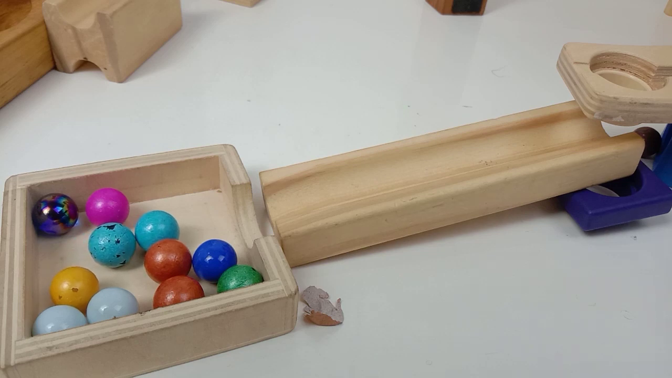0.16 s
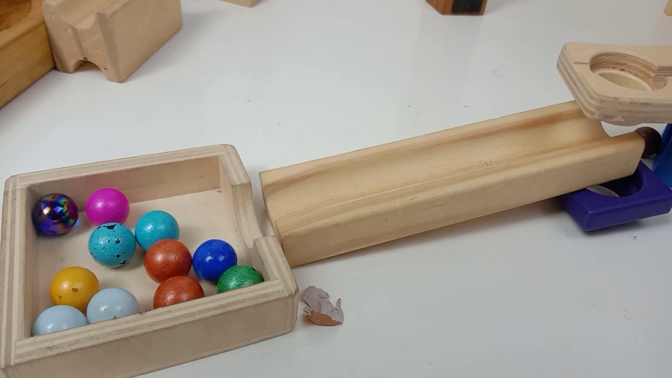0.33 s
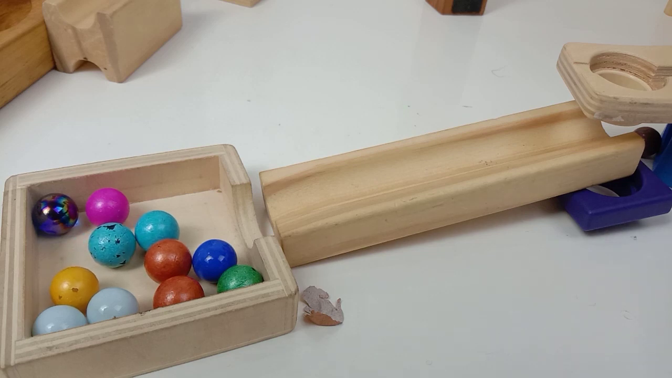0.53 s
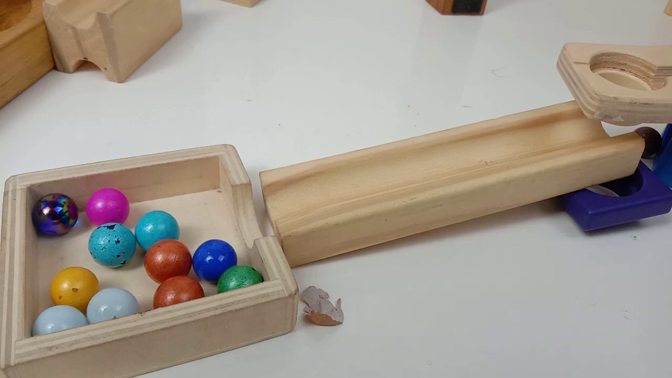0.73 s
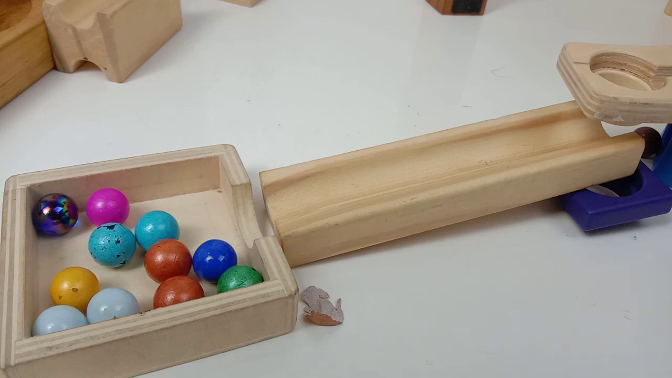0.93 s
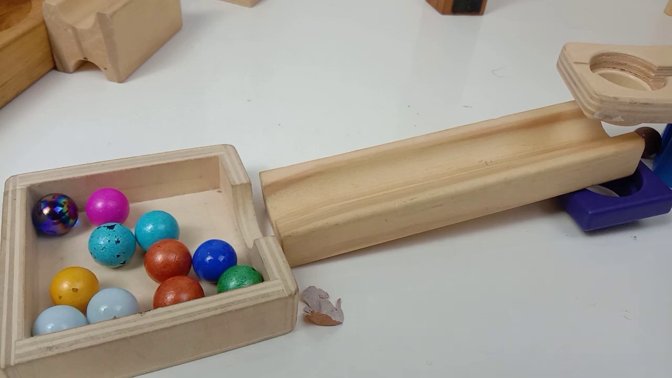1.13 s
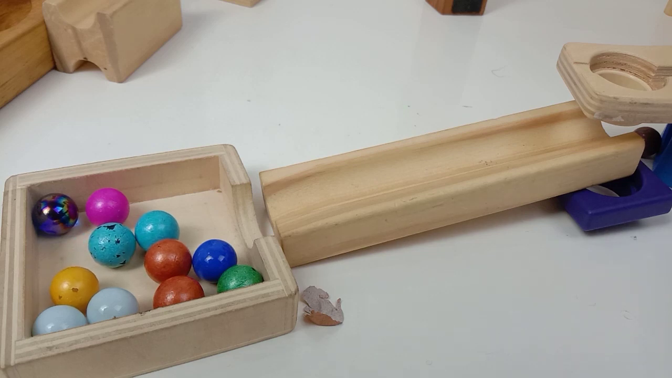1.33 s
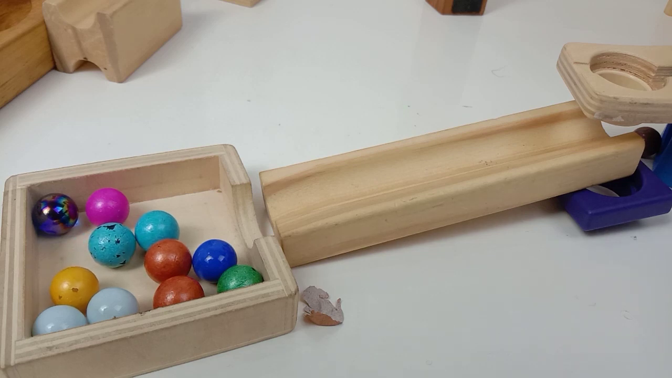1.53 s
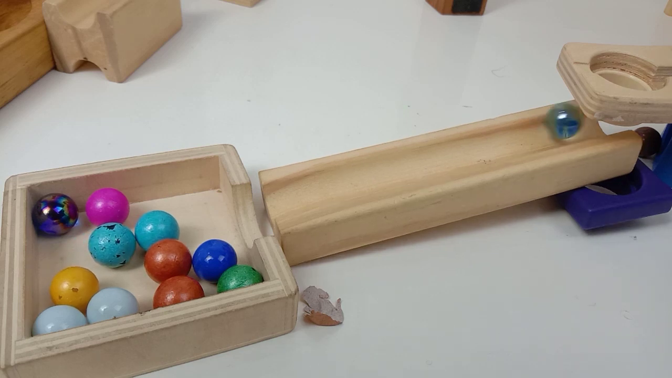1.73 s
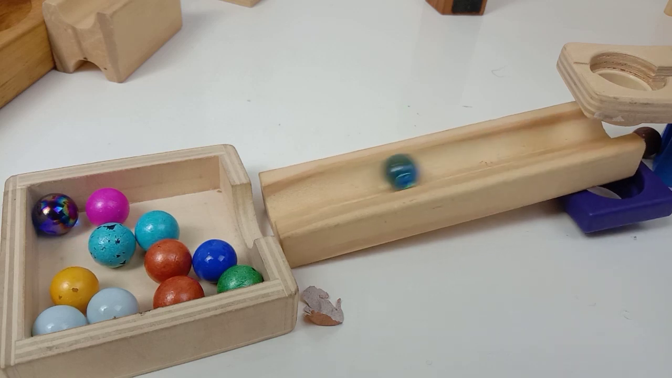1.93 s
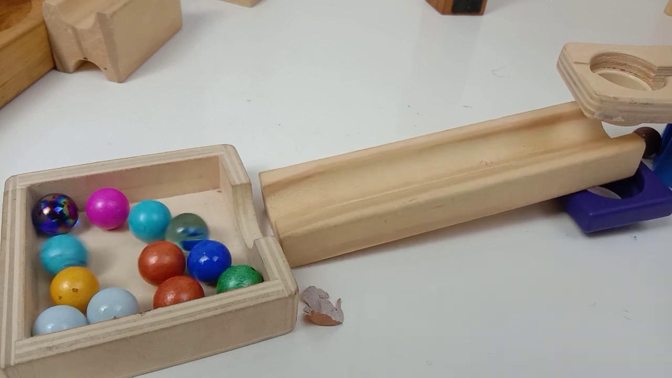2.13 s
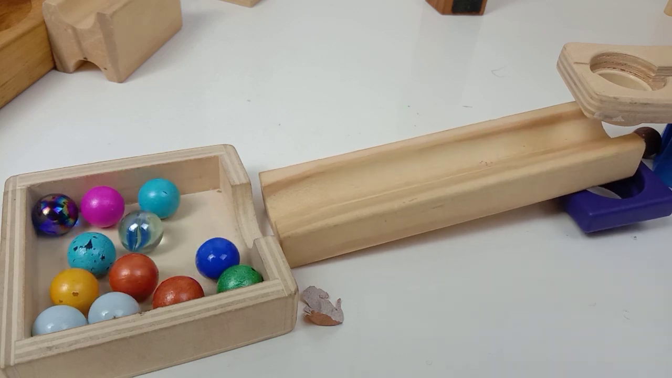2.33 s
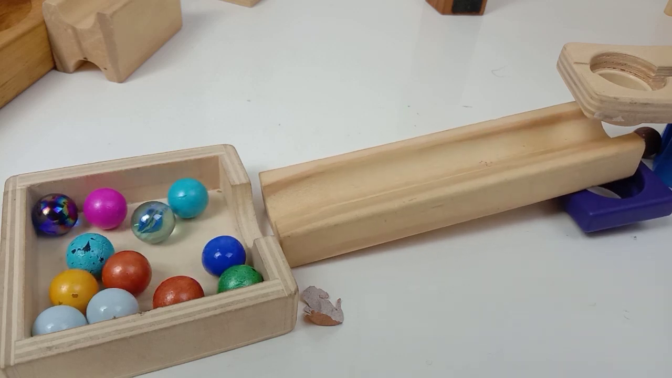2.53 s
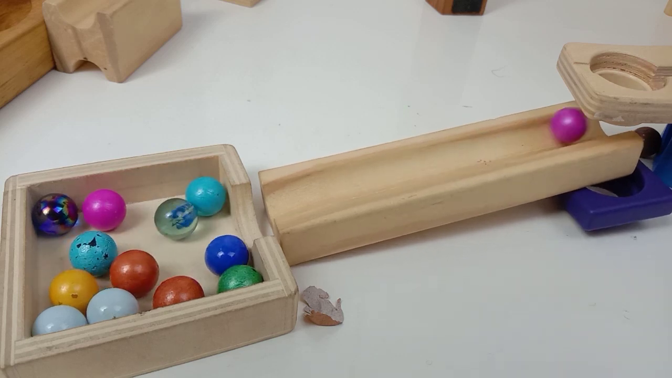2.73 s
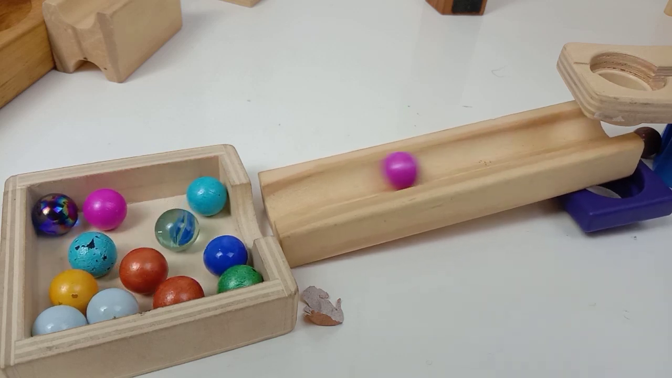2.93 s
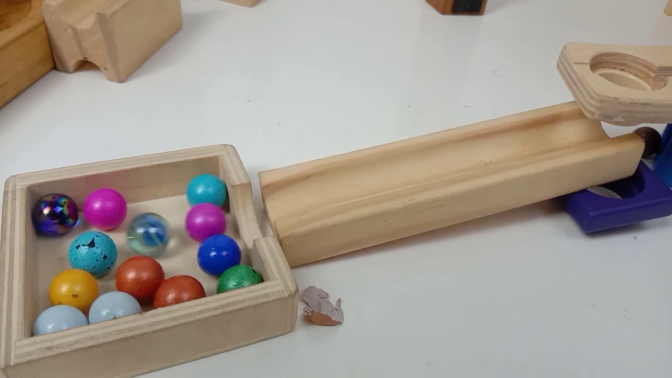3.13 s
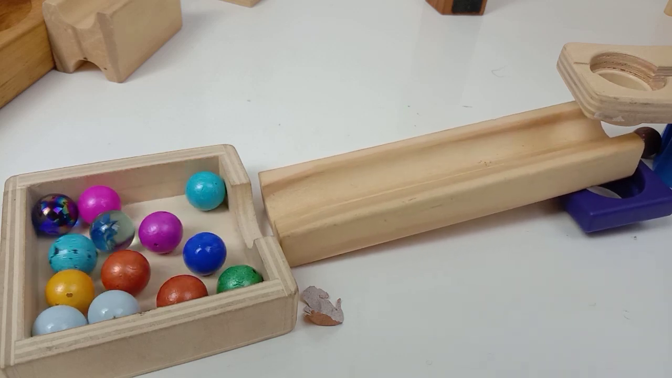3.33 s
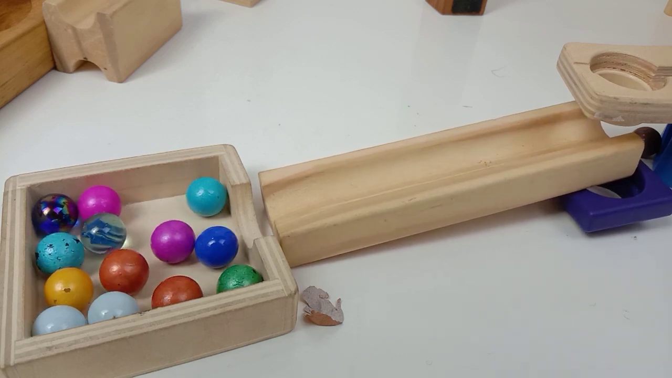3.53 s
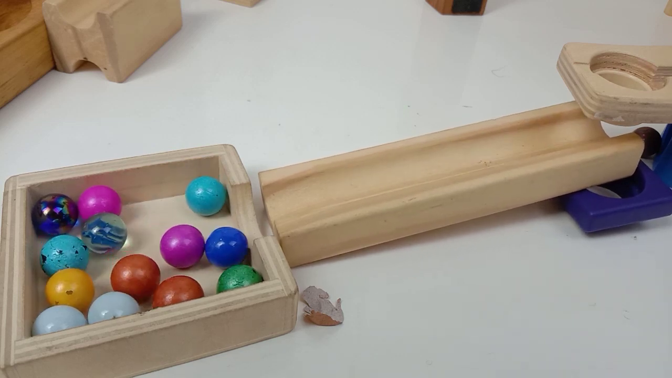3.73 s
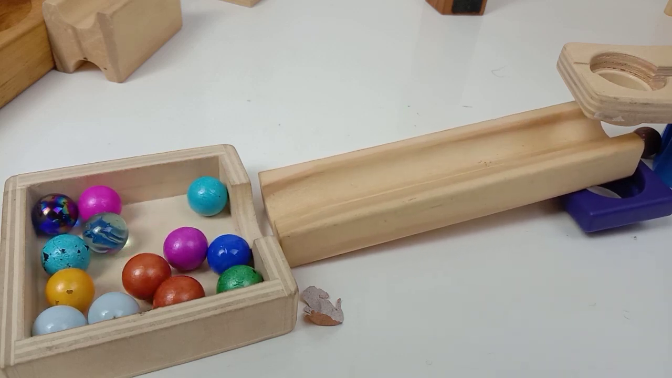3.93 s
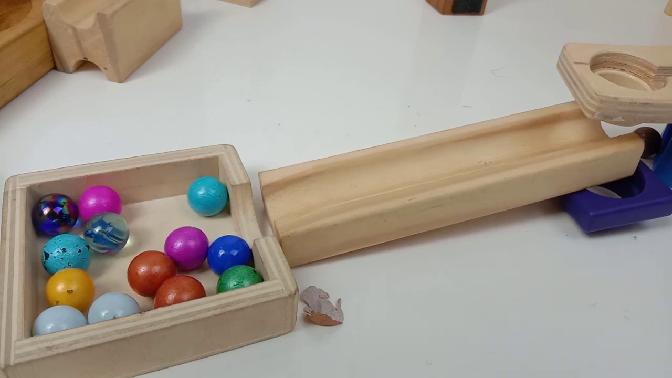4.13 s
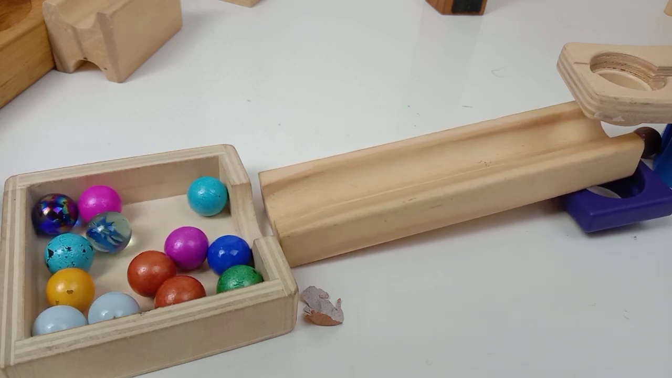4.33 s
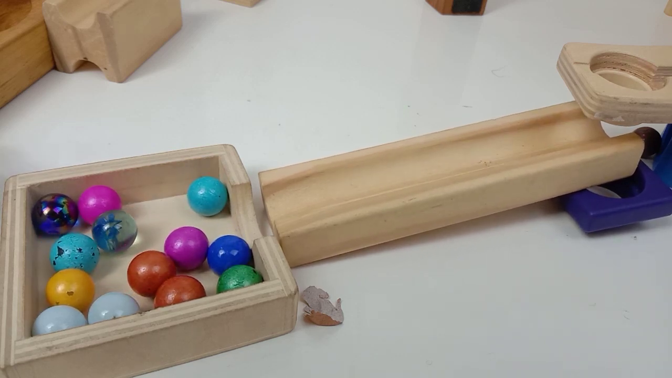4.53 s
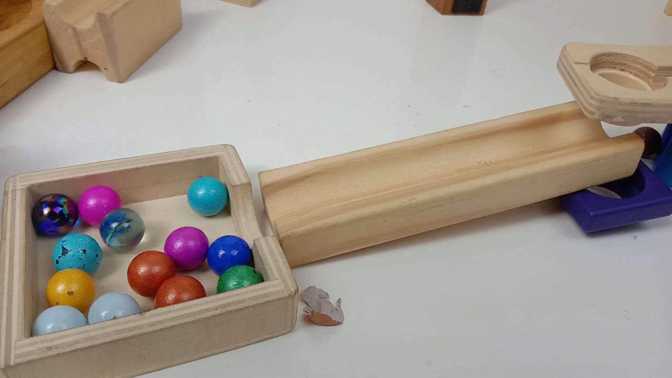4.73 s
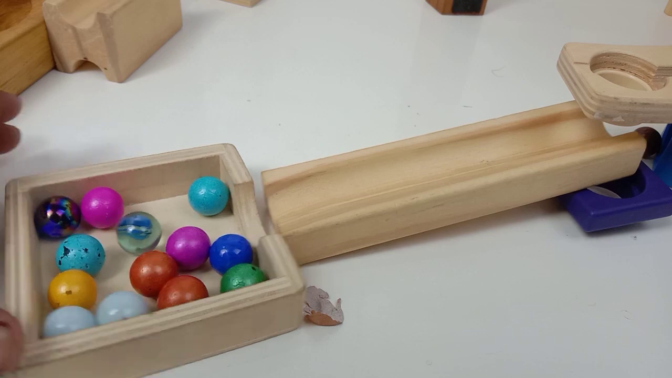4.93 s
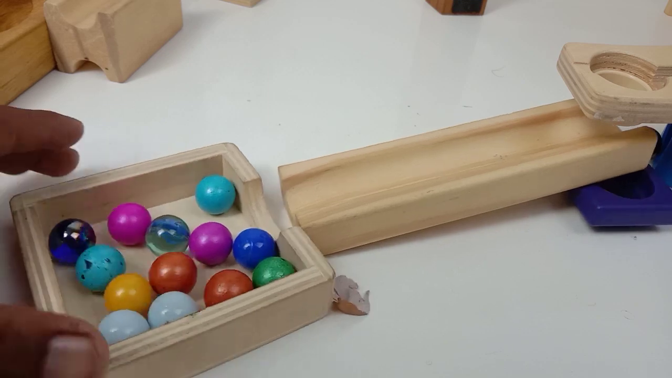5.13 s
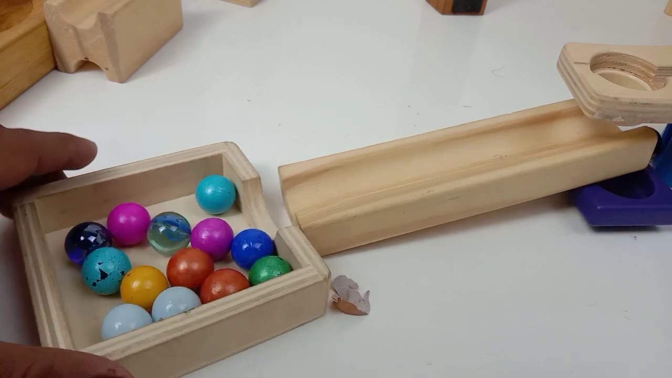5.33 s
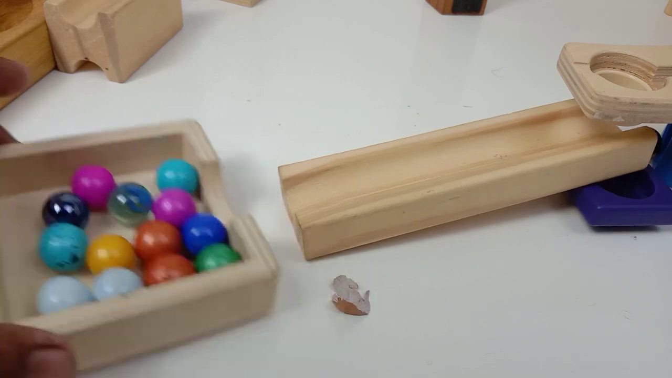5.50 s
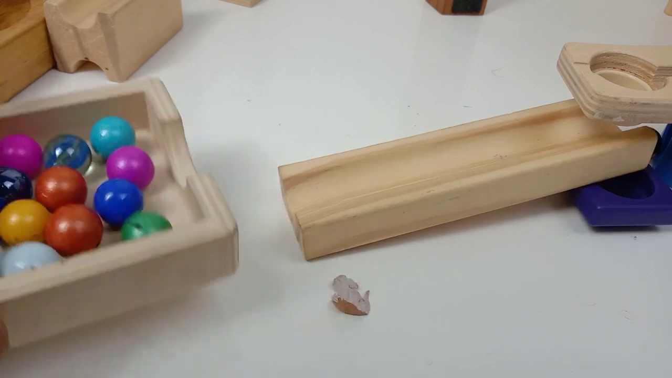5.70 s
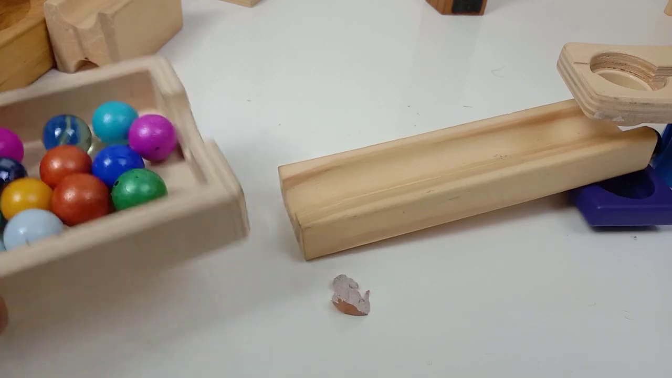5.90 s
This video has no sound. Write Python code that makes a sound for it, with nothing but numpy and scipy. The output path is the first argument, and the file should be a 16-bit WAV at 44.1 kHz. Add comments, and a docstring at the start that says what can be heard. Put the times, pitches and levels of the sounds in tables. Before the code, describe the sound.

Two marbles roll down a wooden ramp and chute into a tray of marbles, which rattle as it is dragged and lifted.

```python
"""A small live room, heard through a close microphone with a limiter. Two marbles in turn drop onto a
wooden ramp, roll along it, fall into a chute and run into a tray full of marbles, which clack and settle.
A hand then drags the tray over the table and lifts it, and the marbles rattle against its walls.
Each impact excites the resonant modes of the body struck; rolling drives the same modes with a stream
of tiny bumps. Diffuse reverberation and a faint hush surround them."""
import sys
import numpy as np
from scipy import signal
from scipy.fft import rfft, irfft
from scipy.io import wavfile
from scipy.ndimage import uniform_filter1d, minimum_filter1d

SR = 44100
rng = np.random.default_rng(int(sys.argv[2]) if len(sys.argv) > 2 else 0)


def transcribe(u):
    """Save the signal u as a 16-bit wav file named by the first command-line argument.

    u: samples, shape (n,) or (channels, n), limited to [-1, 1]; the rate is SR.
    q: integer samples, one column per channel.
    """
    v = np.clip(np.atleast_2d(u).T, -1, 1)
    q = np.round(v * 32767).astype(np.int16)
    wavfile.write(sys.argv[1], SR, q)


N = 267246
SIZE = 16384  # samples in an impulse response
HZ = np.maximum(np.arange(SIZE // 2 + 1) * SR / SIZE, 1)
TIME = np.arange(N) / SR

# Drops onto the ramp. Each row: start in seconds, relative level in dB, hardness (treble gain) in dB,
# flight time in seconds before shrinking.
RAMP_DROPS = [(0.478, -18.5, 3, .0455), (1.3318, -17.5, -3.5, 0.032)]
# Three touches seat a marble in the groove.
# Each row: delay in seconds, level change in dB, thud (low-mid gain) in dB.
SEATING_TOUCHES = [(0, -5, -8.5), (.0037, -0.5, -9.5), (.009, -8, 4)]
# Marbles strike each body. Each row: start in seconds, relative level in dB, hardness in dB.
CHUTE_HITS = [(1.6976, -12, -8), (1.8558, -33.5, -12), (2.718, -7.5, 6), (2.863, -33, 5), (3.0463, -25, -7)]
TRAY_HITS = [(2.0569, -20, 1.5), (2.0983, -23, 4), (2.123, -29.5, -9), (2.144, -20.5, 6),
             (2.2766, -31, -3.5), (2.661, -34.5, -18), (3.0763, -18, -9.5), (3.098, -26, 33),
             (3.1234, -22, -11), (3.2128, -30, -12), (3.42, -49.5, -28), (3.577, -57, -46),
             (3.773, -41.5, 22.5), (4.061, -49.5, -36.5), (5.281, -44.5, -47), (5.38, -46, -52),
             (5.4433, -38.5, 6)]
LIFTED_TRAY_HITS = [(5.4742, -35.5, -3), (5.4939, -27.5, 4.5), (5.507, -34, -2), (5.56, -18.5, -16),
                    (5.6095, -23, -16), (5.649, -19, -20), (5.6611, -13.5, -8), (5.7076, -10.5, -0.5),
                    (5.8012, -22.5, -11.5), (5.8149, -23.5, -3), (5.838, -18, -6.5), (5.9057, -23.5, -16),
                    (5.9207, -12.5, -13.5), (5.9773, -29, -15), (5.9983, -19, -16), (6.0165, -24, -15),
                    (6.0235, -14, -6.5), (6.0356, -12, -6)]
# Glass on glass, bumps of the table, pushes of the hand. Each row: start in seconds, relative level in dB.
GLASS_CLACKS = [(2.0827, -21), (2.0898, -12), (2.244, -27.5), (2.2832, -17.5), (2.4186, -32.5),
                (3.1025, -9), (3.1883, -17.5), (3.2368, -17), (3.467, -33), (3.6656, -44.5), (4.9212, -21),
                (4.961, -18.5), (5.1113, -24), (5.1418, -28), (5.217, -30), (5.3027, -26), (5.3843, -29.5),
                (5.4626, -25.5), (5.5062, -15), (5.524, -15.5), (5.6154, -14), (5.678, -13.5),
                (5.8593, -14.5)]
TABLE_BUMPS = [(3.782, -36.5), (4.063, -30), (4.106, -44), (4.236, -30), (4.942, -25), (5.613, -44),
               (5.643, -46)]
TRAY_SHOVES = [(4.933, -30), (4.977, -28), (4.9858, -20.5), (5.052, -31.5), (5.097, -31)]
# Runs of rolling on each body. Each row: start in seconds, stop in seconds, relative level in dB.
RAMP_ROLLS = [(0.93, 1.61, -41.5), (1.87, 2.61, -42)]
CHUTE_ROLLS = [(1.72, 1.9, -34.5), (1.96, 2.046, -43), (2.73, 2.89, -35.5), (2.93, 3.071, -37.5)]
TRAY_ROLLS = [(3.92, 4.08, -61), (4.91, 5.0, -48), (5.03, 5.12, -59), (5.28, 5.46, -66.5)]
LIFTED_TRAY_ROLLS = [(5.6, 6.06, -36)]
# Spectral envelopes of the impacts. Each row: frequency in Hz, relative level in dB.
RAMP_COLOUR = [(40, -44.5), (90, -11.5), (280, -5), (420, -4), (900, -2), (1400, -8.5), (1650, -14),
               (2600, -12.5), (4000, -18.5), (7200, -24), (9000, -39.5), (13000, -53), (16000, -46)]
CHUTE_COLOUR = [(40, -43), (110, -12.5), (240, -9), (520, -11), (850, -7.5), (1350, -10), (1900, -18.5),
                (2900, -9.5), (4000, -15), (5400, -21.5), (7200, -19), (9000, -43.5), (13000, -52),
                (16000, -55.5)]
TRAY_COLOUR = [(40, -53), (115, -15.5), (220, -14.5), (320, -22), (600, -9.5), (1000, -5.5), (1400, -8),
               (2000, -9.5), (3200, -16.5), (5500, -17), (7400, -24), (9000, -24), (13000, -44.5),
               (16000, -43)]
GLASS_COLOUR = [(100, -45.5), (600, -22), (1200, -10.5), (2600, -16.5), (3800, -8.5), (5500, 2),
                (7500, 4.5), (10000, -13), (13000, -28), (16000, -30)]
TABLE_COLOUR = [(40, -29), (110, -4), (210, 1), (330, -6.5), (520, -12.5), (900, -38), (2000, -41),
                (6000, -50)]
SHOVE_COLOUR = [(40, -41), (110, -13), (220, -3), (310, -3.5), (420, -4), (600, -11.5), (830, 3.5),
                (1250, -4), (1600, -4.5), (2900, -19.5), (4400, -38), (9000, -38), (14000, -63)]
LIFTED_TRAY_COLOUR = [(60, -53), (200, -53), (400, -49), (900, -34.5), (1250, -3), (1500, -9.5),
                      (2400, -16.5), (3000, -7), (4900, -11), (7400, -12.5), (9000, -26.5), (13000, -43),
                      (16000, -39)]
# Spectral envelopes of rolling and of the still room. Each row: frequency in Hz, relative level in dB.
RAMP_RUMBLE = [(40, -31), (115, -3), (220, -3), (320, -13), (430, -9.5), (640, 1.5), (1000, -2.5),
               (1300, -1.5), (1600, -14.5), (2400, -34)]
CHUTE_RUMBLE = [(40, -39.5), (110, -10.5), (180, -6), (270, -1.5), (480, -10), (800, -7.5), (1300, -23),
                (2800, -23)]
TRAY_RUMBLE = [(40, -19.5), (150, 0.5), (400, -22), (650, 3.5), (900, -23), (1300, -8), (2500, -23.5),
               (7000, -16)]
HUSH_COLOUR = [(15, -56.5), (25, -28.5), (70, -6), (82, 0), (141, 0), (195, -12.5), (591, -17.5),
               (1650, -24), (2990, -30), (3430, -25.5), (9070, -34.5), (14800, -42.5), (16000, -37)]
# Resonant modes. Each row: frequency in Hz, bandwidth in Hz, height above the envelope in dB.
RAMP_MODES = [(115, 8.5, 6), (408.8, 25, 15.5), (550.6, 22, 10), (654.4, 35, 9), (859.5, 18, 9),
              (1266.5, 46, 16), (1298, 8.4, 12), (1770, 52, 9), (4930, 240, 6.5), (6200, 270, 8)]
CHUTE_MODES = [(124, 12, 6), (236, 10, 9), (258, 9, 15), (417, 10, 11), (814, 16, 9), (1243, 12, 18),
               (2830, 15, 24), (2885, 24, 16), (3040, 35, 12), (3770, 90, 9), (4790, 70, 16), (6500, 50, 9),
               (6940, 50, 10)]
TRAY_MODES = [(120, 14, 15), (238, 26, 13), (397, 31, 15), (770, 36, 2.1), (798, 24, 12), (1069, 50, 3.8),
              (1260, 33.6, 17.5), (3180, 190, 8), (4030, 780, 6.2), (7440, 400, 7)]
GLASS_MODES = [(1230, 50, 8.1), (7360, 540, 4), (9100, 260, 1.6)]
TABLE_MODES = [(120, 20, 5), (215, 110, 4.8), (408, 60, 5)]
LIFTED_TRAY_MODES = [(1515, 170, 13.8), (1480, 50, 5.8), (1836, 120, 18.7), (2170, 145, 16.8),
                     (2960, 230, 10.6), (3590, 100, 9.4), (4450, 210, 10.4), (7200, 350, 5.5)]
# A thin, high sheen on the clicks. Each row: frequency in Hz, bandwidth in Hz, height in dB.
TOP_TREBLE_PEAK = [(15100, 450, 10)]
# Reverberation time of the room. Each row: frequency in Hz, time to fall 60 dB in seconds.
ROOM_T60 = [(100, .38), (400, .33), (1400, .3), (4000, .3), (8000, .27), (15000, .2)]
# Strength of the reverberation. Each row: frequency in Hz, relative gain in dB.
ROOM_GAIN = [(100, 0), (400, -2), (1400, -6), (4000, -5.5), (8000, -8.5), (15000, -1.5)]


def from_db(db):
    """Amplitude ratio of a level in decibels."""
    return 10 ** (np.asarray(db) / 20)


def rms(x):
    """Root-mean-square amplitude."""
    return np.sqrt(np.mean(x ** 2) + 1e-20)


def at_hz(points, hz=HZ):
    """Linear interpolation on a log-frequency axis."""
    frequencies, values = np.array(points).T
    return np.interp(np.log(hz), np.log(frequencies), values)


def resonances(modes):
    """Resonance: each mode adds a Lorentzian peak of power; the sum is given in dB."""
    peaks = sum((from_db(db) ** 2 - 1) / (1 + (2 * (HZ - hz) / width) ** 2) for hz, width, db in modes)
    return 10 * np.log10(1 + peaks)


def response(curve_db):
    """Minimum-phase impulse response: the onset is sharp, and narrower peaks ring longer."""
    cepstrum = irfft(np.log(from_db(curve_db)))
    cepstrum[1:SIZE // 2] *= 2
    cepstrum[SIZE // 2 + 1:] = 0
    return irfft(np.exp(rfft(cepstrum)))


def through(x, impulse_response):
    """Linear filtering by convolution, cut to the input's length."""
    return signal.fftconvolve(x, impulse_response)[:len(x)]


def impacts(hits, colour, modes, scatter_db, scatter_s, spot_db):
    """Impulse excitation: each contact rings the modes and starts a flurry of internal reflections."""
    track, modes_db = np.zeros(N), resonances(modes)
    thud = at_hz([(110, .2), (300, 1), (600, 1), (1150, 0)])
    hardness = at_hz([(2200, 0), (5200, 1)])
    spot_hz, attack = np.geomspace(100, 16000, 40), int(.005 * SR)
    for s, level_db, thud_db, hardness_db in hits:
        # Each point of contact favours different frequencies.
        spot = at_hz(np.c_[spot_hz, rng.standard_normal(len(spot_hz))])
        contact_db = at_hz(colour) + thud_db * thud + hardness_db * hardness + spot_db * spot
        flurry = rng.standard_normal(SIZE) * np.exp(-TIME[:SIZE] / scatter_s)
        flurry = through(flurry / np.linalg.norm(flurry), response(contact_db + 0.81 * modes_db))
        sound = response(contact_db + modes_db) + from_db(scatter_db) * flurry
        sound *= from_db(level_db) / rms(sound[:attack])
        start = min(int(s * SR), N)
        track[start:start + SIZE] += sound[:N - start]
    return track


def bounces(s, level_db, hardness_db, flight_s, shrink, loss_db, thud_db, softening_db, count):
    """Inelastic rebound: each flight is scaled by shrink, and each touch is weaker and softer."""
    times = s + np.cumsum(flight_s * shrink ** np.arange(count))
    return [(at, level_db - k * loss_db, thud_db, hardness_db - k * softening_db)
            for k, at in enumerate(times, 1)]


def swell(rolls, rise_s, release_s, exponent):
    """Power law: rolling grows louder with speed, holds, then decays exponentially after the run."""
    gain = np.zeros(N)
    for start, stop, level_db in rolls:
        speed = np.clip((TIME - start) / rise_s, 0, 1)
        release = np.exp(-np.maximum(TIME - stop, 0) / release_s)
        gain += from_db(level_db) * speed ** exponent * release
    return gain


def rolling(gain, colour, modes, bumps_per_s, spread_db, surge_db, top_hz):
    """Roughness excitation: the grain gives surges of tiny bumps, low-passed by the contact patch."""
    knots_s = np.arange(0, N / SR, .015)
    surge = np.interp(TIME, knots_s, rng.standard_normal(len(knots_s)))
    roughness = np.minimum(rng.exponential(1, N), 4)
    sizes = from_db(spread_db * roughness + surge_db * surge) * rng.choice([-1, 1], N)
    bumps = sizes * (rng.random(N) < bumps_per_s / SR)
    force = signal.sosfilt(signal.butter(4, top_hz, fs=SR, output="sos"), bumps + 1e-18)
    rumble = through(force, response(at_hz(colour) + resonances(modes)))
    return gain * rumble / rms(rumble)


def jolted(hits, soonest_s, within_s, loss_db, fade_db, uneven_db, count):
    """Momentum transfer: a knock jolts the pile into weaker random contacts, the later the fainter."""
    contacts = []
    for s, level_db, *_ in hits:
        for lateness, size in rng.random((count, 2)):
            touch_db = level_db - loss_db - fade_db * lateness + uneven_db * (size - .5)
            contacts.append((s + soonest_s + within_s * lateness, touch_db, 0, 0))
    return contacts


def hush(level_db=-67):
    """Stationary noise: the faint rumble and hiss of the still room."""
    noise = through(rng.standard_normal(N + SIZE), response(at_hz(HUSH_COLOUR)))[SIZE:]
    return from_db(level_db) * noise / rms(noise)


def ramp():
    """Impact and rolling noise: each marble bounces twice, then its rumble brightens with speed."""
    hits = []
    for s, level_db, hardness_db, flight_s in RAMP_DROPS:
        hits += [(s + delay_s, level_db + touch_db, thud_db, hardness_db)
                 for delay_s, touch_db, thud_db in SEATING_TOUCHES]
        hits += bounces(s, level_db, hardness_db, flight_s,
                        shrink=0.94, loss_db=7, thud_db=2, softening_db=3.5, count=2)
    knocks = impacts(hits, RAMP_COLOUR, RAMP_MODES, scatter_db=4.5, scatter_s=0.0042, spot_db=1.43)
    early = swell(RAMP_ROLLS, rise_s=0.16, release_s=.015, exponent=1.3)
    late = swell(RAMP_ROLLS, rise_s=0.38, release_s=.015, exponent=1.9)
    dull = rolling(early, RAMP_RUMBLE, RAMP_MODES, bumps_per_s=650, spread_db=1, surge_db=3, top_hz=953)
    bright = rolling(late, RAMP_RUMBLE, RAMP_MODES,
                     bumps_per_s=600, spread_db=2, surge_db=6.5, top_hz=3200)
    return from_db(4.5) * knocks + from_db(-8.5) * dull + from_db(-1) * bright


def chute():
    """Lightly damped modes: the loose chute rings like a wood block and hums under the rolling marble."""
    hits, thud_db = [], -4
    for s, level_db, hardness_db in CHUTE_HITS:
        hits.append((s, level_db, thud_db, hardness_db))
        hits += bounces(s, level_db, hardness_db,
                        flight_s=0.059, shrink=1, loss_db=14, thud_db=5, softening_db=2, count=1)
    knocks = impacts(hits, CHUTE_COLOUR, CHUTE_MODES, scatter_db=5.5, scatter_s=0.0058, spot_db=1.56)
    gain = swell(CHUTE_ROLLS, rise_s=0.021, release_s=0.03, exponent=1.2)
    hum = rolling(gain, CHUTE_RUMBLE, CHUTE_MODES,
                  bumps_per_s=900, spread_db=2.5, surge_db=1.5, top_hz=1700)
    return from_db(2.6) * knocks + from_db(-3) * hum


def standing_tray():
    """Recoil: the struck tray rocks back dully onto the table; jolted marbles tap its walls and shift."""
    thud_db = -7.5
    hits = [(s, level_db, thud_db, hardness_db) for s, level_db, hardness_db in TRAY_HITS]
    rebounds = [(s + 0.004098, level_db - 7, thud_db - 8.5, hardness_db - 10.5)
                for s, level_db, hardness_db in TRAY_HITS]
    taps = jolted(hits, soonest_s=.012, within_s=.016, loss_db=10.5, fade_db=7.5, uneven_db=10, count=2)
    knocks = impacts(hits + rebounds + taps, TRAY_COLOUR, TRAY_MODES,
                     scatter_db=2.5, scatter_s=0.0036, spot_db=3)
    gain = swell(TRAY_ROLLS, rise_s=0.016, release_s=.08, exponent=1)
    shifting = rolling(gain, TRAY_RUMBLE, TRAY_MODES,
                       bumps_per_s=1500, spread_db=1, surge_db=0, top_hz=6340)
    return from_db(2.5) * knocks + from_db(2) * shifting


def glass_clacks():
    """Hard contact: glass meets glass briefly, hence brightly; fainter clacks follow each tray knock."""
    thud_db, hardness_db = 0, 1
    hits = [(s, level_db, thud_db, hardness_db) for s, level_db in GLASS_CLACKS]
    jolts = jolted(list(TRAY_HITS) + list(TRAY_SHOVES),
                   soonest_s=0.022, within_s=0.13, loss_db=19, fade_db=11, uneven_db=9.5, count=2)
    jolts += jolted(LIFTED_TRAY_HITS,
                    soonest_s=0.0065, within_s=.06, loss_db=13.5, fade_db=15, uneven_db=2, count=3)
    clear = impacts(hits, GLASS_COLOUR, GLASS_MODES, scatter_db=2, scatter_s=0.0064, spot_db=2.5)
    faint = impacts(jolts, GLASS_COLOUR, GLASS_MODES, scatter_db=0.5, scatter_s=0.0054, spot_db=7)
    return from_db(-12) * clear + faint


def table_bumps():
    """Structure-borne sound: the table top carries soft, dull bumps."""
    hits = [(s, level_db, 0, 0) for s, level_db in TABLE_BUMPS]
    thuds = impacts(hits, TABLE_COLOUR, TABLE_MODES, scatter_db=1, scatter_s=.007, spot_db=4.5)
    return from_db(-10) * thuds


def tray_shoves():
    """Stick-slip friction: pushed by the hand, the tray judders over the table in heavy, dull knocks."""
    hits = [(s, level_db, 0, 0) for s, level_db in TRAY_SHOVES]
    judder = impacts(hits, SHOVE_COLOUR, TRAY_MODES, scatter_db=9.5, scatter_s=0.0073, spot_db=2)
    return from_db(-0.5) * judder


def lifted_tray():
    """Decoupling: off the table the tray loses bass and rings higher as marbles rebound and jostle."""
    thud_db, rebound_s, rebound_loss_db = 7.5, .003, 11
    hits = [(s, level_db, thud_db, hardness_db) for s, level_db, hardness_db in LIFTED_TRAY_HITS]
    rebounds = [(s + rebound_s, level_db - rebound_loss_db, *tone) for s, level_db, *tone in hits]
    knocks = impacts(hits + rebounds, LIFTED_TRAY_COLOUR, LIFTED_TRAY_MODES,
                     scatter_db=5, scatter_s=0.0035, spot_db=4.5)
    gain = swell(LIFTED_TRAY_ROLLS, rise_s=0.19, release_s=.05, exponent=3)
    jostle = rolling(gain, LIFTED_TRAY_COLOUR, LIFTED_TRAY_MODES,
                     bumps_per_s=600, spread_db=3.5, surge_db=2.5, top_hz=12000)
    return from_db(2) * knocks + from_db(-0.5) * jostle


def room(x, first_echo_s, build_s):
    """Reverberation: diffuse echoes build after the first reflection and decay band by band."""
    t = TIME[:2 * SIZE]
    white = rfft(rng.standard_normal(len(t)))
    hz = np.maximum(np.arange(SIZE + 1) * SR / len(t), 1)
    centres, tail = np.geomspace(60, 16000, 12), 0
    build_up = 1 - np.exp(-np.maximum(t - first_echo_s, 0) / build_s)
    for centre, share in zip(centres, np.eye(len(centres))):
        fade = build_up * .001 ** (t / at_hz(ROOM_T60, centre))
        band = irfft(white * at_hz(np.c_[centres, share], hz))
        tail += from_db(at_hz(ROOM_GAIN, centre)) * band * fade / np.linalg.norm(fade)
    return through(x, tail)


def limiter(x, ceiling_db, release_db_per_s):
    """Look-ahead limiting: the gain falls just before a peak over the ceiling and recovers steadily."""
    excess_db = np.maximum(20 * np.log10(np.abs(x) + 1e-9) - ceiling_db, 0)
    recovery_db = release_db_per_s * TIME
    gain_db = recovery_db - np.maximum.accumulate(excess_db + recovery_db)
    held_db = minimum_filter1d(gain_db, size=41)
    return x * from_db(uniform_filter1d(held_db, size=41))


def scene():
    """Direct-to-reverberant ratio: the farther ramp and chute fill the room; the close tray is drier."""
    far = ramp() + chute()
    near = standing_tray() + tray_shoves() + lifted_tray() + glass_clacks() + table_bumps()
    echoes = room(from_db(-1.48) * far + from_db(-4) * near, first_echo_s=0.0066, build_s=0.0019)
    return (far + near + echoes + hush())[None]


def record(dry):
    """Filtering: a narrow peak near 15 kHz adds a thin sheen to the clicks; limiter and low-pass follow."""
    heard = through(dry[0], response(resonances(TOP_TREBLE_PEAK)))
    heard = limiter(heard, ceiling_db=-4.7, release_db_per_s=400)
    low_pass = signal.ellip(8, .2, 80, 15400, fs=SR, output="sos")
    return signal.sosfilt(low_pass, heard)[None]


dry = scene()
out = record(dry)
transcribe(out)
```